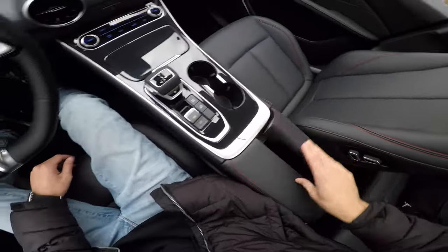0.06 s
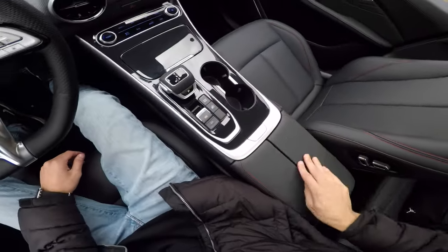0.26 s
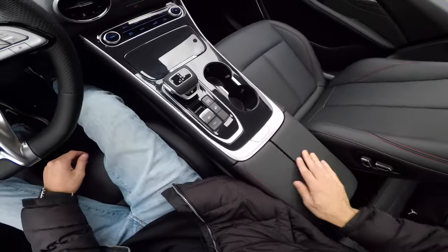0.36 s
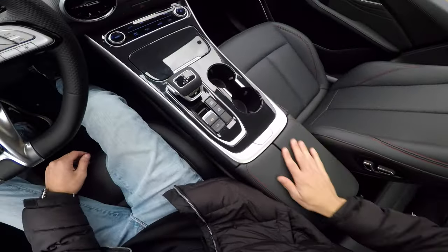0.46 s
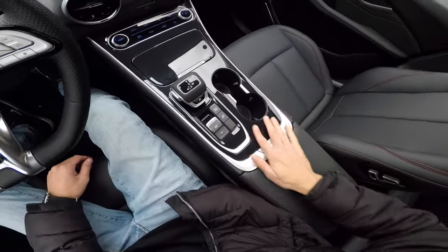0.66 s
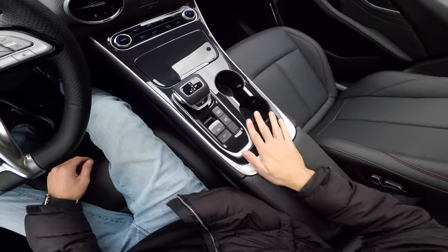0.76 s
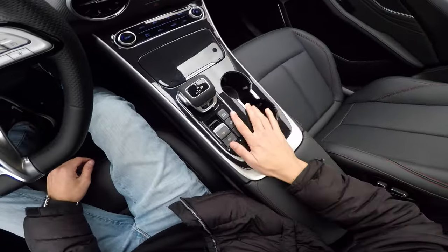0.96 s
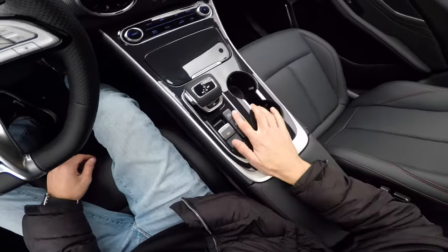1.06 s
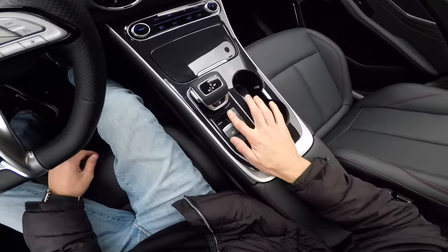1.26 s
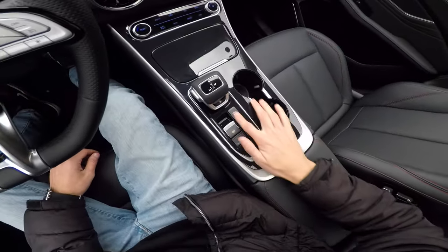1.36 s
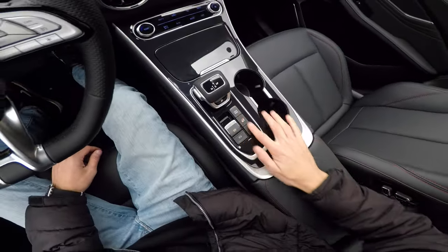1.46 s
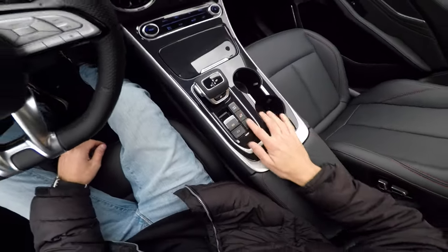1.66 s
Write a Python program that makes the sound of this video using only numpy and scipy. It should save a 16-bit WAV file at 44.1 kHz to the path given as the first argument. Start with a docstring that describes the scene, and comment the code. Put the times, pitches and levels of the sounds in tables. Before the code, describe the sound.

Inside a parked car, a nearby armrest lid snaps shut with one hollow thump. A soft hiss of sleeve fabric and a hand rubbing the console follow, with a quiet cabin rumble and low pulsing underneath.

```python
"""A padded armrest lid is pushed shut inside a parked car. The hinge knocks, the latch clicks over its
catch, and the lid lands with a crack that rings its panels and booms the hollow console box, then settles.
A jacket sleeve hisses through the swing and slides forward as the hand rubs over the console.
Underneath sit a quiet cabin rumble and a soft low pulse, about ten a second. The sound is mono."""
import sys
import numpy as np
from scipy import signal
from scipy.fft import rfft, irfft
from scipy.io import wavfile
from scipy.ndimage import uniform_filter1d

SR = 44100
rng = np.random.default_rng(int(sys.argv[2]) if len(sys.argv) > 2 else 0)


def file_out(sig):
    """Save sig as 16-bit WAV at sys.argv[1]."""
    # one column per channel
    cols = np.atleast_2d(sig).T
    # limit, then scale
    lim = np.clip(cols, -1, 1)
    pcm = np.round(lim * 32767).astype(np.int16)
    wavfile.write(sys.argv[1], SR, pcm)


N = 74970
TIME_S = np.arange(N) / SR
BINS_HZ = np.maximum(np.fft.rfftfreq(N, 1 / SR), 1)


def undb(db):
    """Decibels to gain."""
    return 10 ** (np.asarray(db) / 20)


def since(start_s):
    """Seconds since a cue, zero before it."""
    return np.maximum(TIME_S - start_s, 0)


def rise(t, attack_s):
    """Smooth attack: the longer the contact, the softer the hit."""
    return 1 - np.exp(-(t / attack_s) ** 2)


def fade(t, t60_s):
    """Exponential decay, 60 dB down after t60_s."""
    return np.exp(-np.log(1000) * t / t60_s)


def ring(t, modes):
    """A struck body rings as a sum of damped sines."""
    return sum(undb(db) * np.sin(2 * np.pi * hz * t) * fade(t, t60_s) for hz, db, t60_s in modes)


def noise(colour):
    """Noise shaped by an EQ curve, then set to unit rms."""
    hz, db = np.array(colour, float).T
    gain = undb(np.interp(np.log(BINS_HZ), np.log(hz), db))
    shaped = irfft(rfft(rng.standard_normal(N)) * gain, N)
    return shaped / np.std(shaped)


def resonant_noise(peaks):
    """Noise through parallel resonators, then set to unit rms."""
    gain = sum(undb(db) / (1 + 1j * (BINS_HZ ** 2 - hz ** 2) / (BINS_HZ * width_hz))
               for hz, width_hz, db in peaks)
    shaped = irfft(rfft(rng.standard_normal(N)) * gain, N)
    return shaped / np.std(shaped)


def flicker(rate_hz):
    """Smooth random wander of unit spread."""
    window = max(int(SR / rate_hz), 2)
    wander = uniform_filter1d(uniform_filter1d(rng.standard_normal(N), window), window)
    return wander / np.std(wander)


def reflect(dry):
    """Windows and trim add dense, quickly dying early reflections."""
    response = rng.standard_normal(N) * fade(TIME_S, t60_s=0.032)
    response /= np.linalg.norm(response)
    return dry + undb(-7.5) * signal.fftconvolve(dry, response)[:N]


# EQ of the cabin's room tone and of the low rumble: freq_hz, gain_db
ROOM_TONE_EQ = [(40, -16.5), (130, 2), (240, -1), (330, -2), (500, -9), (1000, -14), (2500, -20.5),
                (5000, -31.5), (7000, -28.5), (11000, -29), (15500, -48)]
RUMBLE_EQ = [(12, -4), (28, 5), (55, -1.5), (80, -12), (103, -6), (135, -13.5), (220, -22), (500, -43),
             (2000, -57)]
# fader ride of the rumble: time_s, level_db
RUMBLE_RIDE = [(0, -54), (.23, -48), (.36, -43.5), (.6, -42.5), (.9, -36.5), (1.15, -41.5), (1.5, -41),
               (1.7, -46.5)]


def cabin():
    """The bed: faint, steady room tone and a low rumble that swells while the arm moves."""
    room_tone = undb(-50.5) * noise(ROOM_TONE_EQ)
    rumble_db = np.interp(TIME_S, *np.array(RUMBLE_RIDE).T)
    return room_tone + undb(rumble_db) * noise(RUMBLE_EQ)


# fader rides for the arm's swing and forward slide, before trims: time_s, hiss_db, rub_db, sheen_db
SWING_RIDE = [(0.0, -61, -69, -70), (0.064, -60, -66, -66), (0.142, -53, -60, -63), (0.23, -56, -61.5, -63)]
SLIDE_RIDE = [(0.33, -61.5, -69, -66), (0.382, -69, -66.5, -69), (0.466, -53.5, -59, -69),
              (0.532, -49.5, -58, -55.5), (0.608, -46.5, -54, -59), (0.692, -44, -46.5, -54.5),
              (0.786, -41.5, -48.5, -50.5), (0.874, -47.5, -53, -64), (1.0, -45.5, -53, -65),
              (1.13, -58, -62.5, -68), (1.374, -55.5, -61.5, -71), (1.412, -65.5, -68, -69),
              (1.516, -53, -59, -62.5), (1.58, -60, -68, -62), (1.684, -60.5, -61, -68),
              (1.7, -63, -69, -69)]
# EQ of the cloth's hiss, its airy sheen and the hand's rub: freq_hz, gain_db
HISS_EQ = [(3000, -29.5), (4900, -14), (6200, -1.5), (7300, -2.5), (8200, -7.5), (9500, -18),
           (11500, -23.5), (15500, -40)]
SHEEN_EQ = [(6000, -22), (9500, 8), (11300, -6), (12800, -2.5), (15500, -14)]
RUB_EQ = [(300, -24), (800, -8), (1500, 1), (2800, 4), (4000, 3.5), (5500, -8), (9000, -13), (15500, -27)]
# console resonances under the hand: pitch_hz, width_hz, gain_db
CONSOLE_PEAKS = [(2820, 63, 5.5), (3190, 25, -2.5), (3710, 72, -3.5), (3990, 39, -15), (4220, 67, 9.5)]


def sleeve_and_hand():
    """Jacket cloth hisses and the hand rubs the console into faint resonance, both with a fine grain."""
    time_s, *faders = np.vstack([SWING_RIDE, SLIDE_RIDE]).T
    hiss_db, rub_db, sheen_db = (np.interp(TIME_S, time_s, fader) for fader in faders)
    hiss = undb(hiss_db + 0.5) * noise(HISS_EQ)
    sheen = undb(sheen_db - 2) * noise(SHEEN_EQ)
    rub = undb(rub_db - 1) * (noise(RUB_EQ) + undb(-7.5) * resonant_noise(CONSOLE_PEAKS))
    grain_db = 0.5 * flicker(rate_hz=600)
    return reflect((hiss + sheen + rub) * undb(grain_db))


# low pulses, each with the pitch it starts on: start_s, level_db, pitch_hz
PULSE_CUES = [(0.094, -31, 170), (.198, -30, 159), (.403, -17, 75), (.505, -25, 127), (.608, -21, 129.6),
              (0.709, -24, 156), (.812, -23, 139), (0.914, -20.5, 112), (1.016, -19.5, 116),
              (1.119, -21.5, 123), (1.221, -22.5, 155), (1.325, -23.5, 144), (1.427, -23, 134),
              (1.529, -24.5, 186), (1.632, -26, 175)]


def low_pulses():
    """A soft throb: each pulse is about one cycle of a tone that quickly sags in pitch."""
    sag_s, end_pitch_ratio, decay_s = 0.006, 0.283, 0.014
    out = 0
    for start_s, level_db, pitch_hz in PULSE_CUES:
        t = since(start_s)
        sag = 1 - np.exp(-t / sag_s)
        cycles = pitch_hz * (end_pitch_ratio * t + (1 - end_pitch_ratio) * sag_s * sag)
        envelope = rise(t, attack_s=0.0025) * np.exp(-t / decay_s)
        out += undb(level_db) * envelope * np.sin(2 * np.pi * cycles)
    return out


# body of the hinge knock: pitch_hz, gain_db, t60_s
HINGE_RING = [(177, -6, 0.042), (193, 1.5, 0.023), (710, -13.5, 0.023)]


def hinge():
    """The hinge gives one soft knock as the lid swings down."""
    t = since(start_s=0.1316)
    return undb(-7) * rise(t, attack_s=0.011) * ring(t, HINGE_RING)


# latch touching its catch and skipping over it: start_s, gain_db
LATCH_HITS = [(0.24356, 0), (0.2476, -12), (0.25042, -5)]
# ring of the latch: pitch_hz, gain_db, t60_s
LATCH_RING = [(835, -26, .05), (1440, -28, .045), (1976, -18, .045), (2157, -8.5, .02)]
# EQ of its crack: freq_hz, gain_db
LATCH_EQ = [(100, -31), (300, -13), (1000, -15), (1500, 3.5), (2400, -1), (2900, -6.5), (5000, -6.5),
            (7000, -4), (9000, -23), (15500, -43)]


def latch():
    """The plastic latch strikes its catch and chatters, each click a crack with a short ring."""
    out = 0
    for start_s, gain_db in LATCH_HITS:
        t = since(start_s)
        crack = undb(-18) * noise(LATCH_EQ) * fade(t, t60_s=0.056)
        out += undb(gain_db) * rise(t, attack_s=0.00019) * (ring(t, LATCH_RING) + crack)
    return out


# body of the hollow console box: pitch_hz, level_db, t60_s
BOX_RING = [(77.4, -18, .2), (147, -22, .2), (229, -13.5, .13), (287, -25, .17), (299, -10, .035),
            (352, -21, .11)]
# EQ of the cabin's dull boom: freq_hz, gain_db
BOOM_EQ = [(30, -6), (60, 7), (120, -7), (200, 0), (350, -0.5), (500, -5.5), (900, -28), (3000, -48)]


def console_box():
    """The weight of the hit: the closing lid thumps the hollow box and the cabin booms with it."""
    t = since(start_s=0.254)
    thump = rise(t, attack_s=0.0056) * ring(t, BOX_RING)
    boom = undb(-29) * rise(t, attack_s=0.011) * fade(t, t60_s=0.16) * noise(BOOM_EQ)
    return thump + boom


# lid landing and seating: start_s, gain_db
LID_HITS = [(0.2573, -1), (0.2596, -3.5), (0.2617, -12), (0.2705, -11)]
# ring of the lid and console panels: pitch_hz, level_db, t60_s
PANEL_RING = [(571, -24, 0.067), (819.5, -24, 0.082), (900, -23.5, 0.066), (1445, -16, 0.041),
              (1516, -20, 0.064), (2210, -13, 0.031), (2390, -14.5, 0.037), (2430, -21, 0.044),
              (2724, -17, 0.036), (3450, -22.5, 0.053), (4900, -13, 0.025), (6232, -18, .055),
              (6580, -21, 0.035), (6810, -19, .055)]
# EQ of the lid's crack: freq_hz, gain_db
LID_EQ = [(60, -56), (300, -12.5), (550, -2.5), (700, -8), (1100, -10.5), (1500, -10), (2400, -6),
          (3300, -13), (4700, -9.5), (6300, -1.5), (7400, -4), (9000, -16), (11000, -24), (13000, -29),
          (15500, -37)]


def lid_landing():
    """The lid lands in quick hits, each a crack with a short cabin tail; the first rings the panels."""
    t = since(LID_HITS[0][0])
    out = rise(t, attack_s=0.0011) * ring(t, PANEL_RING)
    for start_s, gain_db in LID_HITS:
        t = since(start_s)
        crack = undb(-18) * fade(t, t60_s=0.032)
        tail = undb(-19) * fade(t, t60_s=0.088)
        out += undb(gain_db) * rise(t, attack_s=0.00013) * (crack + tail) * noise(LID_EQ)
    return out


# bumps on the padding: start_s, gain_db
SETTLE_HITS = [(0.31, -24), (0.355, -28.5)]
# their low body: pitch_hz, gain_db, t60_s
SETTLE_RING = [(76, 1, 0.084), (141, -3, 0.053)]


def lid_settling():
    """The lid sinks onto its padding under the hand with two dull bumps."""
    out = 0
    for start_s, gain_db in SETTLE_HITS:
        t = since(start_s)
        out += undb(gain_db) * rise(t, attack_s=0.0065) * ring(t, SETTLE_RING)
    return out


def scene():
    """The mix: the closing lid over cloth, pulses and cabin, the same in both ears."""
    closing = hinge() + latch() + lid_landing() + console_box() + lid_settling()
    mono = closing + sleeve_and_hand() + low_pulses() + cabin()
    return np.array([mono, mono])


def record(dry):
    """Master chain: a soft clip rounds the loudest peaks and a steep low-pass cuts the top."""
    ceiling, cutoff_hz = 0.95, 15800
    rounded = dry / (1 + (dry / ceiling) ** 6) ** (1 / 6)
    low_pass = signal.ellip(10, 0.2, 80, cutoff_hz, fs=SR, output="sos")
    return signal.sosfilt(low_pass, rounded)


dry = scene()
out = record(dry)
file_out(out)
```